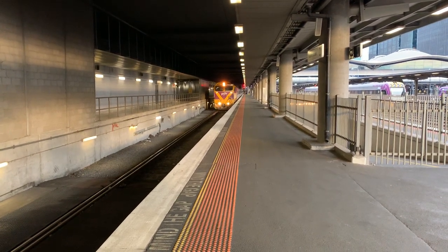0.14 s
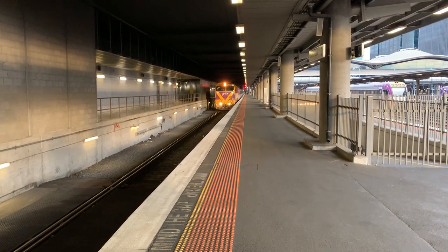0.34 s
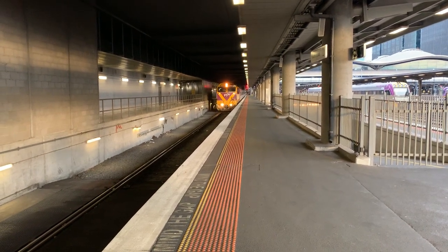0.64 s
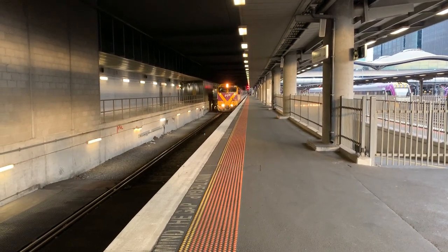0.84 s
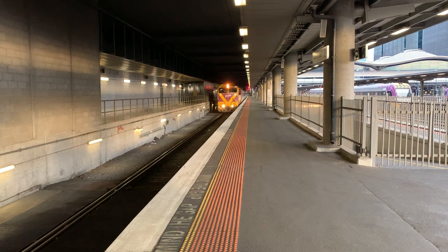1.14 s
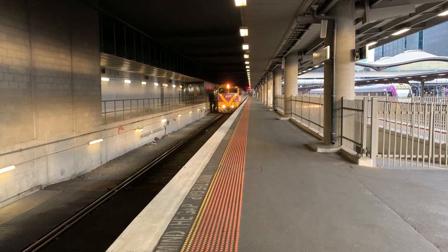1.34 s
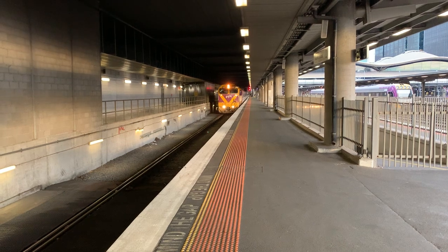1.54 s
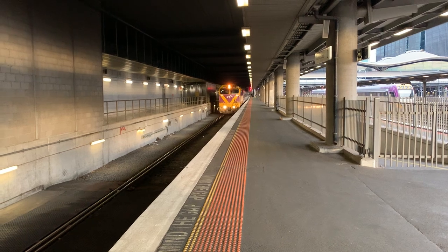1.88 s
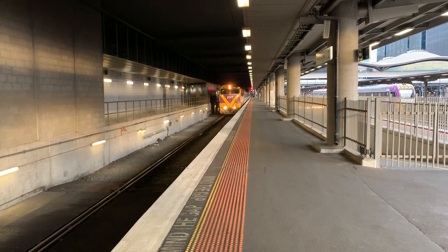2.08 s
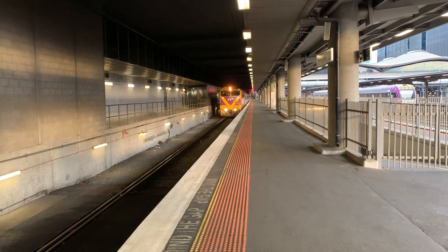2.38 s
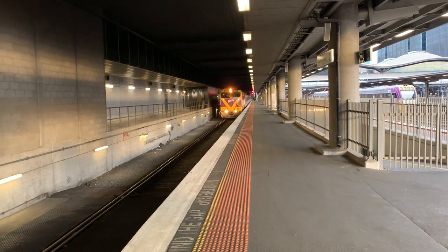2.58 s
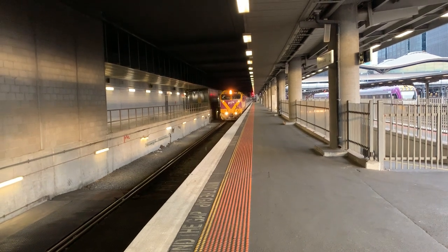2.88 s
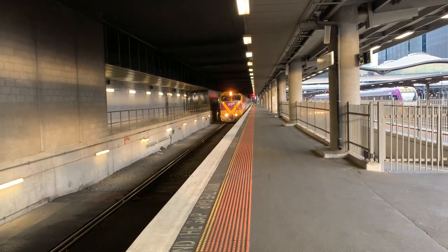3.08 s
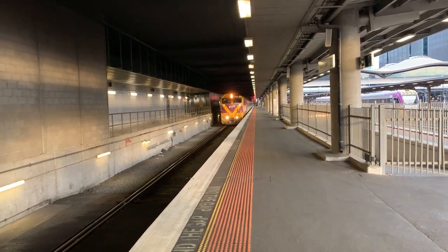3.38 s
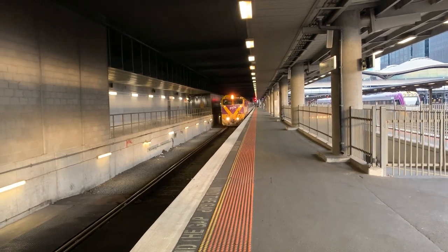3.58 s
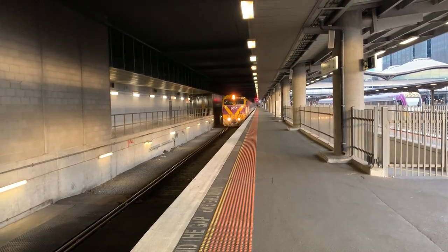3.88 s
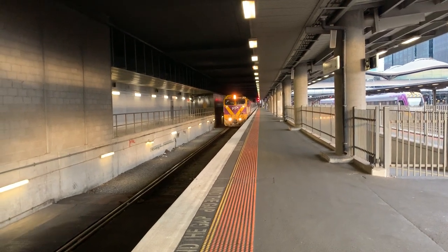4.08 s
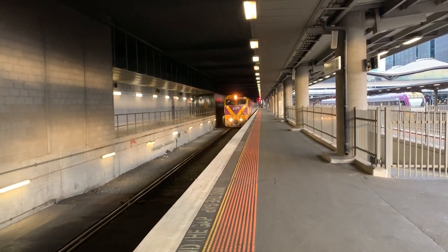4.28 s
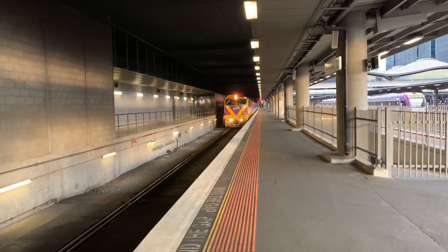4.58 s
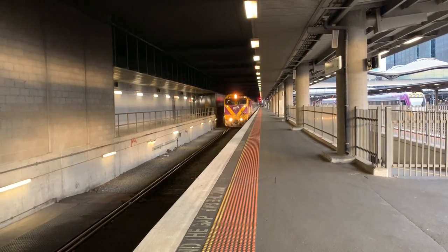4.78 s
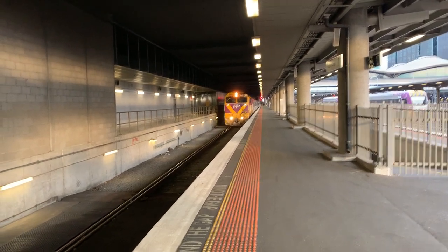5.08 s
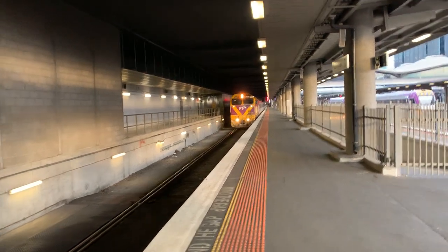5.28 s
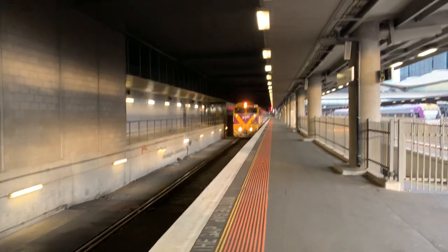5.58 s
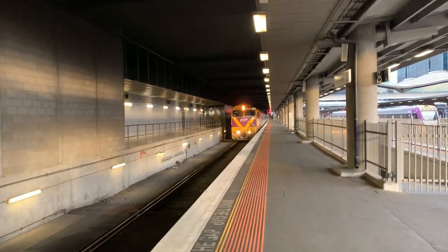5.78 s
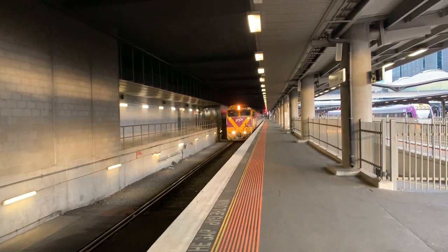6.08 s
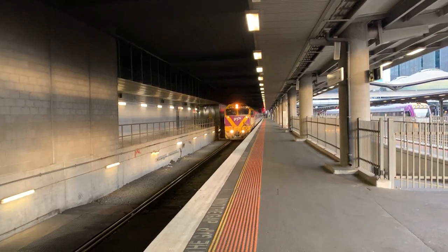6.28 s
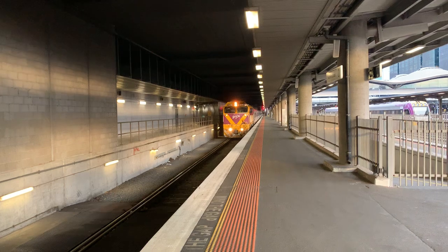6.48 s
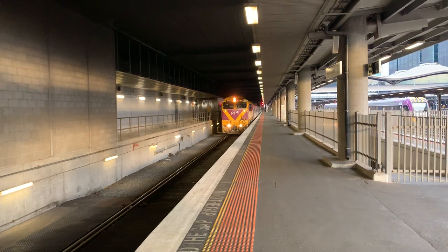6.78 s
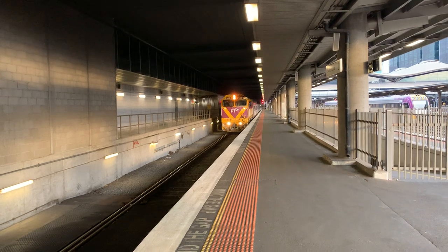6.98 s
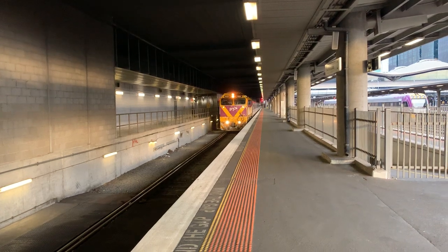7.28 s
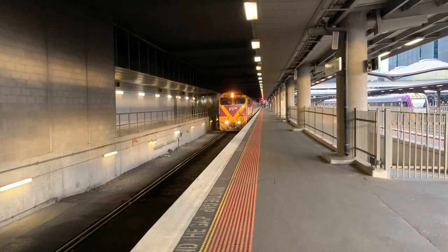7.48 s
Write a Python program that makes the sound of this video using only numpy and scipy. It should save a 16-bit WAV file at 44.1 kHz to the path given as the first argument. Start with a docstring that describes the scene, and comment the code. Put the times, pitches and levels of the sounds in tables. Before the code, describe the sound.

From 0 seconds a diesel locomotive idles slowly closer along a covered concrete platform: a deep boom around 55 hertz, throbbing unevenly, with soft roaring fans and wheels, wavering blower and gear whine and a little high hiss. The rumble grows gradually, its pitch rising only slightly, until about 4.8. Around 4.6 to 4.8 air starts to hiss; a short spitting squeak and a first reedy horn note break out. By 5.0 a lower bell catches, others join by 5.3, starting slightly sharp and sinking into tune. From 5.5 to 6 the valve opens fully: a very loud, brassy, buzzing five-note chord with rushing air, shimmering and swelling between hard walls, while the engine is pushed underneath. Near 7.0 the valve shuts; the bright edge vanishes quickly and the low chord rings and flutters away under the roof until 7.6, with the subdued rumble continuing.

```python
"""On a covered concrete platform a diesel locomotive creeps along, and a five-bell air horn sounds.
The bells are sums of harmonics that start sharp, speak in turn and settle into a chord; overtones, sum tones
and rushing air give it brass, and echoes ring on under the roof. Crank orders of a shared phase make the
exhaust throb, fluttering sines make the blower and gears whine, and shaped noise is the roar of fans and wheels.
A gain control pushes the rumble down beneath the horn."""
import sys
import numpy as np
from scipy import signal
from scipy.fft import rfft, irfft, next_fast_len
from scipy.io import wavfile
from scipy.ndimage import uniform_filter1d, map_coordinates

SR = 44100
rng = np.random.default_rng(int(sys.argv[2]) if len(sys.argv) > 2 else 0)


def output_pcm(signal):
    """Save a mono or channel-first signal as 16-bit PCM at the path in sys.argv[1].

    Samples are clipped to [-1, 1] before scaling.
    """
    pcm = np.clip(np.atleast_2d(signal).T, -1, 1) * 32767
    wavfile.write(sys.argv[1], SR, np.round(pcm).astype(np.int16))


N = 337365
TIME = np.arange(N) / SR
TOP_HZ = 15750  # band limit
# the air valve: the low bell begins to catch, the valve begins to open fully, the valve shuts
CAUGHT_S, FULL_S, SHUT_S = 4.985, 5.48, 6.955
REFERENCE_S = 6  # when the end wall's lag and the growth of the horn's tones are stated


# partials of each bell, fundamental first, swelling as the horn moves through standing waves:
# (relative level [dB], swell depth [dB], crest time [s], crest spacing [s], extra early in the blast [dB])
LOW_BELL = [(-6, 4, 5.94, 3.24, -0.5), (0.14, 5.5, 5.51, 2.18, 0), (-4, 3, 5.94, 1.16, -1.5),
            (-9.5, 3, 6.95, 0.82, 7), (-9.5, 6, 6.61, 2.5, 1), (-11, 12, 6.226, 2.1, 1.5),
            (-15.5, 6.5, 5.98, 2.2, 2.5), (-22.5, 14, 6.3, 2.9, 3), (-17, 5, 6.57, 2.07, 0.5),
            (-22, 4, 6.6, 0.92, 0), (-26, 6, 5.75, 1.9, 0), (-26, 3, 5.95, 0.91, -3),
            (-26, 4, 6.15, 3.1, -3.5), (-28.5, 4, 6.6, 3.3, -5), (-29, 1.5, 6.3, 0.84, -1.5)]
SECOND_BELL = [(-2, 4.4, 6.3, 1.66, -0.73), (-8, 5, 6.1, .62, -0.9), (-16.5, 7.5, 6.35, 1.56, 1),
               (-19, 8, 6.57, 2.36, 0.31), (-17.5, 1.2, 5.3, 0.97, 0.95), (-22.5, 4.1, 6.22, 1.3, 0),
               (-29, 2.5, 4.3, 1.5, 1), (-28, 3.3, 4.56, 1.5, 0)]
THIRD_BELL = [(-7.5, 5.6, 6.82, 2.5, 0), (-17.5, 9.1, 6.2, 3.1, 0), (-25, 11, 6.33, 3.8, 0)]
FOURTH_BELL = [(0, 2.66, 6.15, 1.9, 0), (-10.5, 3.3, 5.75, 1, -0.5), (-24.5, 6.5, 5.7, 3.3, -2),
               (-36, 4.4, 6.1, 3.1, 2)]
TOP_BELL = [(-11, 5.3, 5.71, 1.34, 0)]


def horn(tones_db=-1.0, echo_db=-17):
    """Superposition: low partials, rasp, sum tones and turbulent air add, and the station echoes them."""
    tables = [LOW_BELL, SECOND_BELL, THIRD_BELL, FOURTH_BELL, TOP_BELL]
    partials = sum(bell(rows, index=i) for i, rows in enumerate(tables))
    tones = amp(tones_db) * partials + squeak() + spit()
    sound = hall(end_wall(tones), wet_db=echo_db) + blare() + rasp() + valve_hiss() + rush()
    return sound + roof(sound)


# interaural pattern of the standing waves: (frequency [Hz], left phase lead [rad], left minus right [dB])
STANDING = [(266, -2.2, -0.4), (327, -1.2, -0.1), (382, -0.7, -0.6), (462, -0.4, -1.2), (533, -0.6, -4.4),
            (580, 0.9, -2.3), (654, 1.5, -1.4), (799, -0.8, -4.7), (925, 0.8, -1.6), (984, -0.6, -2.7),
            (1066, 1.2, 1.5), (1330, -0.8, -1.9), (1596, -0.6, -0.5), (1863, -0.6, -0.4), (2128, 0.7, -1.6),
            (2394, 1.0, -2.7)]
# rise time of each bell, low to high: [s]
SPEAK_S = [0.081, 0.11, 0.081, 0.1, 0.09]
SPLUTTER, SPLUTTER_S = 0.44, 0.1  # uneven start: phase scatter [rad], decay time constant [s]
EARLY_S, EARLY_FADE_S = 5.36, .18  # when the early balance gives way, and how long it takes
CLOSING_DB_PER_S = 1.5  # steady growth of the bells' partials through the blast [dB/s]


def bell(rows, index, flutter_db=2.0, drift_db=0.45, tail_flutter_db=4.5, overtone_lag_s=0.0014):
    """Harmonic synthesis: partials share one phase, and standing waves give each its swell and place."""
    start, note = BELLS[index][:2]
    phase, out = turning(pitch(index)), 0
    standing = np.array(STANDING)
    blown, ringing = np.minimum(TIME, SHUT_S), opening(SHUT_S, 0.15)
    starting = np.exp(-np.maximum(TIME - start, 0) / SPLUTTER_S)
    early = 1 - opening(EARLY_S, EARLY_FADE_S)
    for k, (db, swell_db, crest, period, early_db) in enumerate(rows, 1):
        hz = k * note
        level = db + early_db * early
        level = level + swell_db * np.cos(2 * np.pi * (blown - crest) / period)
        level = level + CLOSING_DB_PER_S * (blown - REFERENCE_S)
        # once the valve shuts only echoes are left, and they come unevenly
        level = level + flutter_db * wobble(22) + drift_db * wobble(6)
        level = level + tail_flutter_db * ringing * wobble(13)
        speaking = opening(start + overtone_lag_s * (k - 1), SPEAK_S[index])
        envelope = amp(level) * speaking * dying(hz)
        apart = along(standing[:, :2], hz) / 2 + 0.045 * wobble(2.8)
        scatter = (0.29 + 0.62 * ringing) * wobble(9.2)
        scatter = scatter + SPLUTTER * np.sqrt(k) * starting * wobble(90)
        pair = np.sin(k * phase + rng.uniform(0, 2 * np.pi) + scatter + np.array([apart, -apart]))
        out = out + np.sqrt(2) * envelope * pair * lean(along(standing[:, ::2], hz))
    return out


# bells, low to high: (speaks at [s], settled pitch [Hz], starting sharpness [share], settling time [s])
BELLS = [(4.97, 265.85, .014, .37), (4.81, 326.3, .017, .2), (5.2, 382.2, .005, .3), (4.9, 461.7, .018, .2),
         (5.3, 579, .004, .3)]


def pitch(index):
    """Exponential relaxation: a bell starts sharp and sinks to its note as the air flow settles."""
    start, hz, sharp, settle = BELLS[index]
    return hz * (1 + sharp * np.exp(-np.maximum(TIME - start, 0) / settle))


# reverberation of the chord once the valve shuts: (frequency [Hz], t60 [s])
RING = [(260, 1.73), (380, .85), (460, 1.2), (530, 1.15), (800, 1.03), (1300, 0.52), (2200, 0.57),
        (8000, 0.34)]


def dying(hz):
    """Exponential decay: steady while the valve is open, then ringing out at one frequency's t60."""
    return amp(-60 * np.maximum(TIME - SHUT_S, 0) / along(RING, hz))


# filter gains of the rasp at half and at full pressure: (frequency [Hz], level [dB])
HALF_COLOUR = [(800, 7), (1500, 18), (2700, 11), (4000, 7.5), (4900, 5), (6000, 4.5), (7200, 2),
               (9000, -9.5), (12000, -9.5), (15500, -25)]
FULL_COLOUR = [(800, 4), (1500, 10.5), (2700, 3), (3600, 3), (4700, -4), (5800, 1.5), (7200, 4.5),
               (9200, -3.5), (11000, 0.5), (13000, -12), (15500, -15.5)]


def rasp(db=-13.5, speak_s=0.054):
    """Spectral brightening: the clean overtones grow louder and brighter as the valve opens."""
    slaps = patchy(hall(chord(), wet_db=1), depth_db=3.5, size=22)
    full = opening(FULL_S, 0.5) * (1 - opening(SHUT_S, 0.3))
    half_edge = levelled(slaps, HALF_COLOUR, 3500, 13000)
    full_edge = levelled(slaps, FULL_COLOUR, 3500, 13000)
    edge = (1 - full) * half_edge + full * full_edge
    gain = amp(db + pressure_db(lone_db=-12.5, half_db=-9))
    return gain * edge * opening(BELLS[1][0] + 0.017, speak_s) * dying(8000)


# partials of other bells that shift copies of the low bell's overtones:
# (bell index, partial (negative: difference tones), level at half pressure [dB], at full [dB])
RIDERS = [(1, 2, -5.5, -7), (1, 1, -17, -11), (3, 1, -14.5, -11.5), (2, -1, -16, -12)]


def chord(jitter=.00065, second_db=-14):
    """Intermodulation: the second bell leads, then others ride on the low bell's overtones."""
    caught, full = opening(CAUGHT_S, 0.055), opening(FULL_S, 0.45)
    low = buzz(index=0, count=len(LOW_BELL), jitter=jitter)
    second = buzz(index=1, count=len(SECOND_BELL), jitter=jitter)
    riding = 0
    for i, k, half_db, full_db in RIDERS:
        gain = amp(half_db + (full_db - half_db) * full)
        riding = riding + gain * np.exp(1j * k * turning(pitch(i)))
    sums = riding * buzz(index=0, count=2, jitter=jitter)
    return (caught * (low + sums) + (1 - caught + amp(second_db) * caught) * second).real


def buzz(index, count, jitter, size=4096):
    """Periodic impact: a diaphragm slapping shut each cycle has harmonics far above the first count."""
    hz = pitch(index)
    k = np.arange(size)
    heard = (k > count) & (k * hz.max() < TOP_HZ)
    cycle = np.fft.ifft(heard * np.exp(1j * rng.normal(0, 0.31, size))) * size
    turns = turning(hz * (1 + jitter * wobble(120))) / (2 * np.pi)
    return np.interp(turns % 1 * size, k, cycle)


# filter gains of the blare: (frequency [Hz], level [dB])
BLARE_COLOUR = [(400, -19), (700, -4), (1000, 2), (1400, 0.5), (1900, -4.5), (2400, -2.5), (3000, -5.5),
                (4200, -8), (5500, -12), (9000, -35)]
# strength at each bell's mouth, low to high: [dB]
DRIVE_DB = [2.5, 2.5, -8, -4.5, -9.5]


def blare(db=-8.0, half_db=-12, fall=0.86, triple_db=-6, jitter=.0012, count=9, t60_s=0.69):
    """Nonlinear steepening: products of two or three loud waves breed sum tones between the chord's lines."""
    waves = []
    for i, drive_db in enumerate(DRIVE_DB):
        spin = np.exp(1j * turning(pitch(i) * (1 + jitter * wobble(60))))
        wave = 0
        # nested products build a harmonic series with strengths 1 / k ** fall
        for k in range(count, 0, -1):
            wave = (wave + np.exp(2j * np.pi * rng.random()) / k ** fall) * spin
        waves.append(amp(drive_db) * opening(BELLS[i][0], SPEAK_S[i]) * wave)
    whole = sum(waves)
    pairs = whole ** 2 - sum(wave ** 2 for wave in waves)
    thicket = unit(pairs.real) + amp(triple_db) * unit((pairs * whole).real)
    thicket = filtered(hall(thicket, wet_db=1.0), lambda f: amp(along(BLARE_COLOUR, f)))
    thicket = patchy(thicket / np.std(thicket[:, TIME > FULL_S]), depth_db=3.5, size=20)
    half = 1 - opening(FULL_S, 0.38)
    return amp(db + half_db * half - 60 * np.maximum(TIME - SHUT_S, 0) / t60_s) * thicket


SQUEAK_AT_S, SQUEAK_FALL_S, SQUEAK_HZ = 4.822, .15, 805


def squeak(db=-10.0, rough=0.0092, step_db=-11, count=4):
    """Overblowing: the low bell's brief high note forms a row of sum tones with the second bell."""
    rise = SQUEAK_FALL_S / 4
    shape = opening(SQUEAK_AT_S, rise) * (1 - opening(SQUEAK_AT_S + rise, SQUEAK_FALL_S))
    phase, second = turning(SQUEAK_HZ * (1 + rough * wobble(60))), turning(pitch(1))
    return shape * sum(amp(db + step_db * k) * np.sin(phase + k * second) for k in range(count))


# relative spectral density of the first air: (frequency [Hz], level [dB per Hz])
SPIT_COLOUR = [(250, -27.0), (560, -5.0), (750, -0.5), (1000, -2.5), (1500, -13), (2600, -21.5),
               (4800, -22.5), (7000, -30), (12000, -48)]


def spit(db=-21, at_s=4.81, rise_s=.06, t60_s=0.5):
    """Transient turbulence: the first air spits past the diaphragms before they hold their notes."""
    decay_db = -60 * np.maximum(TIME - at_s - rise_s, 0) / t60_s
    return amp(db + decay_db) * opening(at_s, rise_s) * coloured_noise(SPIT_COLOUR)


# relative spectral density of the valve's hiss: (frequency [Hz], level [dB per Hz])
VALVE_COLOUR = [(1200, -9), (2200, 2.5), (3000, 1.5), (4700, 2), (7200, 3), (9000, -9), (11000, -1.5),
                (13000, -15), (15500, -15.5)]


def valve_hiss(db=-15, at_s=4.63, rise_s=.3):
    """Jet turbulence: air hisses past the diaphragms from the moment the valve cracks open."""
    noise = coloured_noise(VALVE_COLOUR, lowest_hz=300)
    gain = amp(db + pressure_db(lone_db=-7.5, half_db=-14))
    return gain * noise * opening(at_s, rise_s) * dying(8000)


def pressure_db(lone_db, half_db):
    """Source level against supply pressure: first bell alone, then valve half open, then 0 dB at full."""
    return lone_db * (1 - opening(CAUGHT_S, 0.098)) + half_db * (1 - opening(FULL_S, 0.52))


# relative spectral density of air rushing through the bells: (frequency [Hz], level [dB per Hz])
RUSH_COLOUR = [(190, -38), (280, -8), (450, -4.5), (900, -1), (1400, -7.5), (2200, -30)]


def rush(db=-22, half_db=-7):
    """Flow noise: air through the bells fills the chord's gaps and lingers as a diffuse wash."""
    noise = patchy(coloured_noise(RUSH_COLOUR), depth_db=3.0, size=8)
    half = 1 - opening(FULL_S, .45)
    return amp(db + half_db * half) * noise * opening(CAUGHT_S, .1) * dying(400)


# exhaust orders of uneven cylinders:
# (multiple of the crank speed, level re the boom when far [dB], when near [dB])
ORDERS = [(6, -29, -28), (7, -22.5, -25), (8, -14, -30.5), (10, -17, -19), (11, -22, -21.5),
          (12, -15, -21.5), (13, -37, -37), (14, -34.5, -38.5), (15, -20.5, -24.5), (16, -16.5, -28),
          (17, -29.5, -35.5), (18, -25.5, -29.5), (19, -33, -31.5), (26, -28.5, -37), (30, -42, -39.5),
          (36, -40, -37)]
# engine speed: (time [s], strongest exhaust line [Hz])
SPEED = [(0, 53.8), (.5, 53.95), (1.5, 54.47), (2.5, 55.1), (3.5, 55.53), (5.5, 55.98), (7.65, 55.8)]
# position of the locomotive: (time [s], nearness [0-1])
APPROACH = [(0, 0), (1, 0.21), (2.4, 0.53), (3.2, 0.71), (4.8, 1), (7.65, 0.5)]
# relative spectral density of the chuff: (frequency [Hz], level [dB per Hz])
CHUFF_COLOUR = [(15, -29.5), (30, -6.0), (50, 17.0), (100, 31.0), (135, -8.0), (220, -57.0)]
EXHAUST_DB, EXHAUST_RISE_DB = -16.5, 6.5  # gain when far, extra when near


def exhaust(order=9, boom_db=3, crank_start=1.419, chuff_db=-24, lead=0.34):
    """Beating: the covered platform booms at one crank order, and neighbouring orders make it throb."""
    near, = curves(APPROACH)
    crank = turning(curves(SPEED)[0]) / order + crank_start
    ports = np.array([[lead], [-lead]])  # left-right phase [rad]
    beats = np.sin(order * crank + ports)
    for k, far_db, near_db in ORDERS:
        # a phase growing as the square of the order smears each firing in time
        delay = .45 * (k - order) ** 2
        gain = amp(far_db + (near_db - far_db) * near ** 1.2 + wobble(1.3))
        beats = beats + gain * np.sin(k * crank + delay + ports + 0.2 * wobble(2))
    chuff = coloured_noise(CHUFF_COLOUR, channels=1)
    sound = amp(boom_db) * beats + amp(chuff_db) * chuff
    return amp(EXHAUST_DB + EXHAUST_RISE_DB * near) * sound * lean(-4.0)


# relative spectral density of fans and wheels: (frequency [Hz], level [dB per Hz])
ROAR_COLOUR = [(70, -41), (130, 3.5), (200, -16.5), (245, -8), (330, -8.5), (480, -6), (620, -12.5),
               (760, -14), (1100, -17.5), (1500, -19), (2500, -27), (4700, -35.5), (6000, -44.5),
               (8000, -78.5)]
# left-right coherence of the roar: (frequency [Hz], correlation [-1 to 1])
ROAR_ALIKE = [(60, 1), (130, -0.93), (290, -0.28), (640, 0.94), (1410, -0.076), (3100, -0.14),
              (6820, -0.54), (15000, -0.25)]
# balance of the roar: (frequency [Hz], left minus right [dB])
ROAR_LEAN = [(60, -0.5), (180, 0.5), (550, -2.5), (1650, 0), (4970, -2.5), (15000, -21.5)]
# blower and gear tones: (frequency at the final engine speed [Hz], level re the roar when far [dB],
# when near [dB], flutter rate [knots/s], standing-wave swell depth [dB], crest time [s], crest spacing [s])
WHINES = [(248.3, -20, -16, 3, 6.5, 2.6, 2.3), (333, -16, -14, 5, 3, 3.1, 1.5),
          (438, -16, -18, 14, 1.5, 0.49, 1.3), (490.3, -13.5, -11.5, 9, 0.5, 3.9, 0.96),
          (732, -18, -10.5, 6, 1.5, 3.11, .78), (984, -22.5, -21.5, 35, 2, 0.97, 1.7),
          (1460, -25, -21, 35, 3, 2.3, 2.5), (3253, -36.5, -24.5, 70, 2, 5.2, 3.4),
          (4140, -32.5, -34.5, 55, 3, 1.7, 4), (5196, -30.5, -27, 130, 1, 2.3, 3.6),
          (10000, -62.5, -40.5, 400, 2, 2.8, 4)]
# relative spectral density of the hiss: (frequency [Hz], level [dB per Hz])
MACHINE_HISS_COLOUR = [(4000, -29), (5800, -6.0), (7000, -2), (8400, -26.5), (10500, -13.5),
                       (12500, -34.5), (15000, -45.5)]
ROAR_DB, ROAR_RISE_DB = -28, 4.5  # gain when far, extra when near


def machinery(hiss_db=-33, near_hiss_db=8):
    """Broadband and tonal sources: fans and wheels roar; blower and gear tones follow the engine speed."""
    hz, near = curves(SPEED)[0], curves(APPROACH)[0]
    roar = rolling_roar()
    for tone_hz, far_db, near_db, width, swell_db, crest, period in WHINES:
        db = far_db + (near_db - far_db) * near
        db = db + swell_db * np.cos(2 * np.pi * (TIME - crest) / period)
        phase = turning(tone_hz * hz / hz[-1])
        shared = wobble(width) * np.sin(phase)
        separate = np.array([wobble(width), wobble(width)]) * np.cos(phase)
        roar = roar + amp(db) * (shared + separate)
    # air soaks up the hiss while the locomotive is far
    hiss = amp(hiss_db + near_hiss_db * (near - 0.5)) * coloured_noise(MACHINE_HISS_COLOUR)
    return amp(ROAR_DB + ROAR_RISE_DB * near + 0.36 * wobble(7.9)) * (roar + hiss)


def rolling_roar():
    """Partial coherence: mid and side noises mix so the ears' likeness varies with frequency."""
    pair = patchy(rng.standard_normal((2, N)), depth_db=1, size=10)

    def mid_side(f):
        turn = np.arccos(np.clip(along(ROAR_ALIKE, f), -1, 1)) / 2
        return amp(along(ROAR_COLOUR, f)) * np.array([np.cos(turn), np.sin(turn)])

    mid, side = filtered(pair, mid_side)
    halves = np.array([[.5], [-.5]])
    ears = np.array([mid + side, mid - side])
    return unit(filtered(ears, lambda f: amp(along(ROAR_LEAN, f) * halves)))


TRAIN_M_PER_S, SOUND_M_PER_S, END_WALL_S = 2.24, 343, .2684  # speeds; echo lag at REFERENCE_S


def end_wall(x, echo_db=-11.0, dull_hz=650):
    """Doppler shift: the dull echo from behind has a lengthening path, so it is flat and low notes beat."""
    lag = END_WALL_S + 2 * TRAIN_M_PER_S / SOUND_M_PER_S * (TIME - REFERENCE_S)
    dull = filtered(x, lambda f: 1 / (1 + (f / dull_hz) ** 4))
    return x + amp(echo_db) * np.array([np.interp(TIME - lag, TIME, side) for side in dull])


# reverberation between the concrete walls: (frequency [Hz], t60 [s])
HALL = [(200, 0.83), (1000, 1.6), (3000, 0.68), (8000, 0.25), (15000, 0.11)]


def hall(x, wet_db, decay=HALL):
    """Diffuse reverberation: decaying stereo noise echoes x, with the total power about kept."""
    hz, t, z = signal.stft(rng.standard_normal((2, SR)), SR, nperseg=256)
    tail = signal.istft(z * amp(-60 * t / along(decay, hz)[:, None]), SR, nperseg=256)[1]
    echo = signal.fftconvolve(np.atleast_2d(x), tail, axes=1)[:, :N]
    return (x + amp(wet_db) * unit(echo) * np.std(x)) / np.hypot(1, amp(wet_db))


# reverberation of the late echo: (frequency [Hz], t60 [s])
ROOF = [(200, 0.94), (1000, 1.9), (3000, 1.7), (5000, 1.3), (8000, .4), (15000, .2)]
# filter gains into the roof: (frequency [Hz], level [dB])
ROOF_COLOUR = [(300, -16), (550, -12), (800, 3.0), (1200, 0.5), (2000, 0.5), (5000, 1.5), (9000, -12.0)]


def roof(x, db=-15.0, smear_s=0.00024):
    """Multipath delay modulation: many changing paths under the roof blur the late echo's upper partials."""
    coloured = filtered(x, lambda f: amp(along(ROOF_COLOUR, f)))
    echo = hall(coloured, wet_db=19.5, decay=ROOF)
    return amp(db) * np.array([np.interp(TIME - smear_s * wobble(25), TIME, side) for side in echo])


def patchy(x, depth_db, size):
    """Interference: shifting reflections make nearby frequencies swell and fade, over size frames."""
    z = signal.stft(x, nperseg=1024)[2]
    field = rng.standard_normal(z.shape[-2:])
    for _ in range(2):
        field = uniform_filter1d(uniform_filter1d(field, size=4, axis=0), size=size, axis=1)
    return signal.istft(z * amp(depth_db * unit(field)), nperseg=1024)[1][..., :N]


# sensitivity of the gain control: (frequency [Hz], weight [dB])
SENSED = [(120, -32), (250, -1), (500, -1), (1600, 1.5), (6000, 4)]


def gain_control(x, limit_db=-14, attack_s=0.06, least_fall_db_per_s=0.27, size=256):
    """Compression: gain sinks quickly when weighted sound passes the limit, else drifts slowly down."""
    sensed = filtered(x, lambda f: amp(along(SENSED, f)))
    power = np.abs(uniform_filter1d(np.mean(sensed ** 2, axis=0), size=4 * size))[::size]
    step, gains = size / SR, [0]
    for wanted in np.minimum(limit_db - 10 * np.log10(power + 1e-12), 0):
        gap = wanted - gains[-1]
        change = min(gap * (1 - np.exp(-step / attack_s)), -least_fall_db_per_s * step)
        gains.append(gains[-1] + change)
    return x * amp(np.interp(TIME, TIME[::size], gains[1:]))


def amp(db):
    """Logarithmic level: decibels to gain."""
    return 10 ** (np.asarray(db) / 20)


def unit(x):
    """Effective value: x at rms 1."""
    return x / np.sqrt(np.mean(x ** 2) + 1e-20)


def along(points, hz):
    """Logarithmic frequency: (frequency, value) points read off a log axis."""
    f, v = np.transpose(points)
    return np.interp(np.log(hz + 1), np.log(f + 1), v)


def curves(rows):
    """Linear interpolation: one value per sample for each column after the time."""
    s, *cols = np.transpose(rows)
    return [np.interp(TIME, s, c) for c in cols]


def wobble(rate):
    """Slow random modulation: a smooth curve through rate knots a second."""
    coarse = TIME[::32]
    knots = rng.standard_normal(int(TIME[-1] * rate) + 4)
    return np.interp(TIME, coarse, map_coordinates(knots, [coarse * rate]))


def filtered(x, response):
    """Linear filtering: the spectrum of x times a response of frequency."""
    m = next_fast_len(N + SR // 2)
    return irfft(rfft(x, m) * response(np.fft.rfftfreq(m, 1 / SR)), m)[..., :N]


def coloured_noise(colour, channels=2, lowest_hz=0):
    """Spectral shaping: white noise given a colour, at rms 1."""
    white = rng.standard_normal((channels, N))
    return unit(filtered(white, lambda f: amp(along(colour, f)) * (f >= lowest_hz)))


def levelled(x, colour, lo_hz, hi_hz):
    """Band-level normalisation: x coloured, with a steady rms of 1 in the given band."""
    x = filtered(x, lambda f: amp(along(colour, f)))
    band = filtered(x, lambda f: (f > lo_hz) & (f < hi_hz))
    power = np.abs(uniform_filter1d(np.mean(band ** 2, axis=0), size=4000))
    return x / np.sqrt(power + 1e-12)


def turning(hz):
    """Phase accumulation: the integral of a frequency curve [rad]."""
    return 2 * np.pi * np.cumsum(hz) / SR


def lean(db):
    """Interaural level difference: left and right gains, left minus right db."""
    return amp(np.array([[db / 2], [-db / 2]]))


def opening(start, rise):
    """Raised-sine onset: a smooth step from 0 to 1."""
    return np.sin(np.pi / 2 * np.clip((TIME - start) / rise, 0, 1)) ** 2


def scene():
    """Superposition of independent sources: horn, exhaust and machinery."""
    return horn() + exhaust() + machinery()


def record(dry):
    """Dynamic and band limiting: gain sinks under the horn, high peaks are rounded, the top is cut."""
    held = gain_control(dry)
    rounded = held / (1 + np.abs(held / .97) ** 10) ** (1 / 10)
    return filtered(rounded, lambda f: f < TOP_HZ)


dry = scene()
out = record(dry)
output_pcm(out)
```